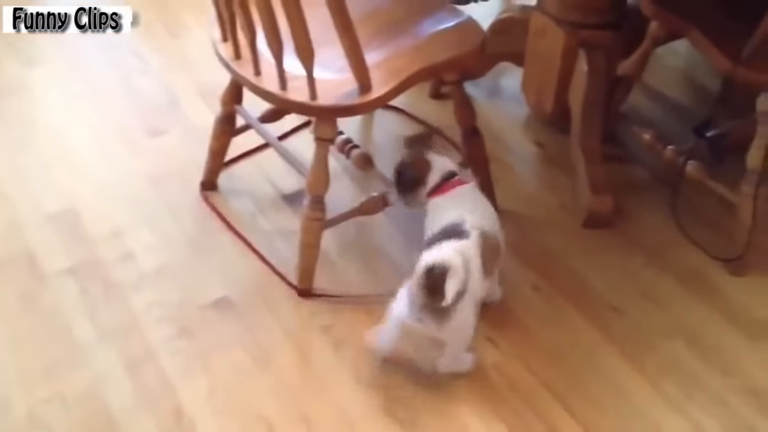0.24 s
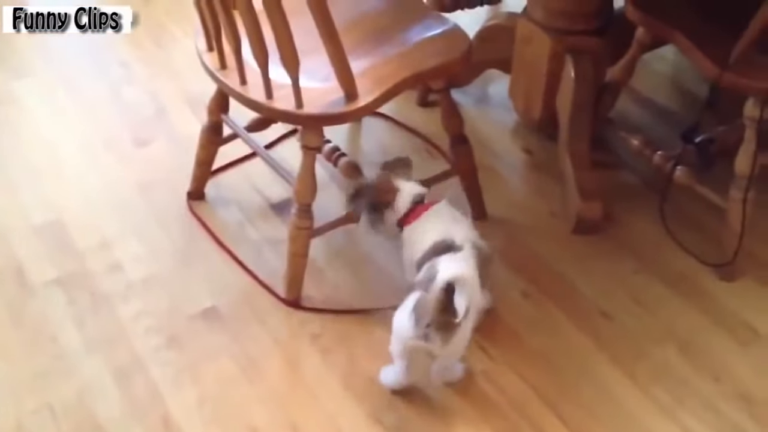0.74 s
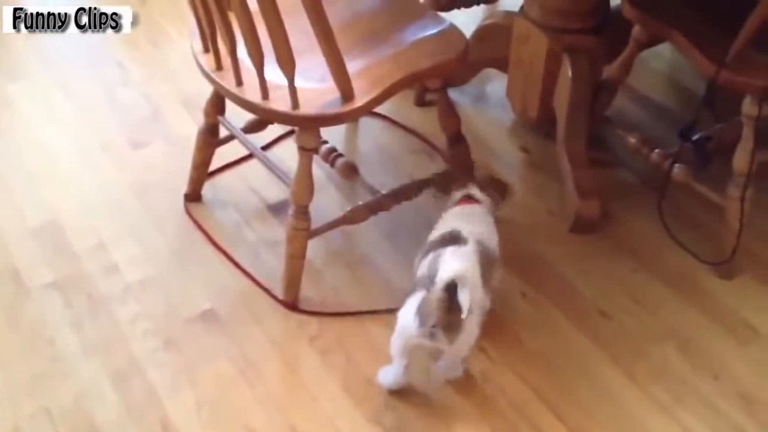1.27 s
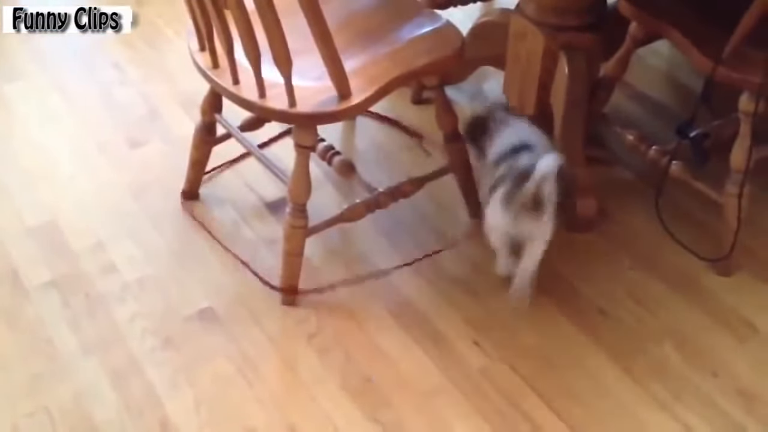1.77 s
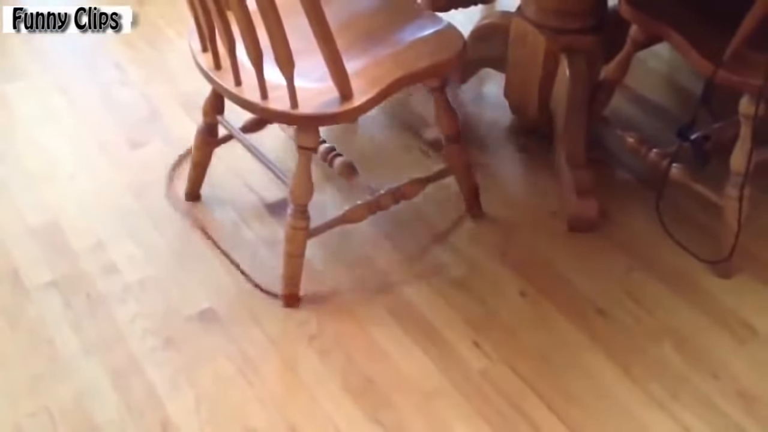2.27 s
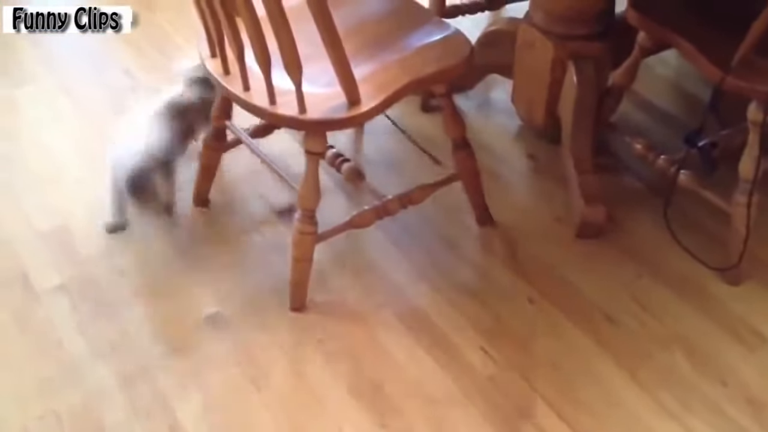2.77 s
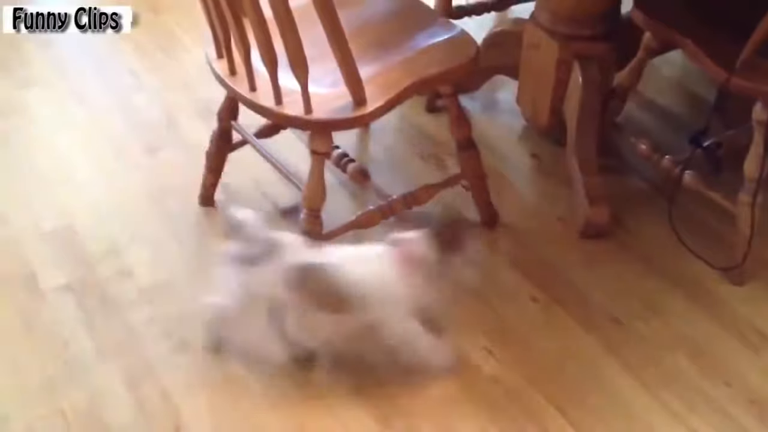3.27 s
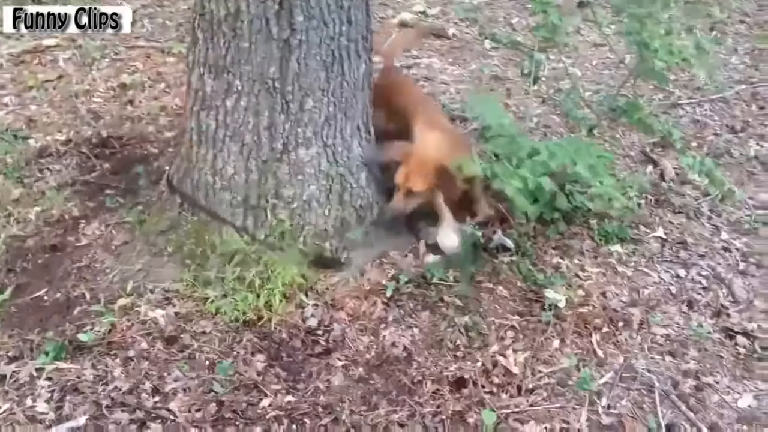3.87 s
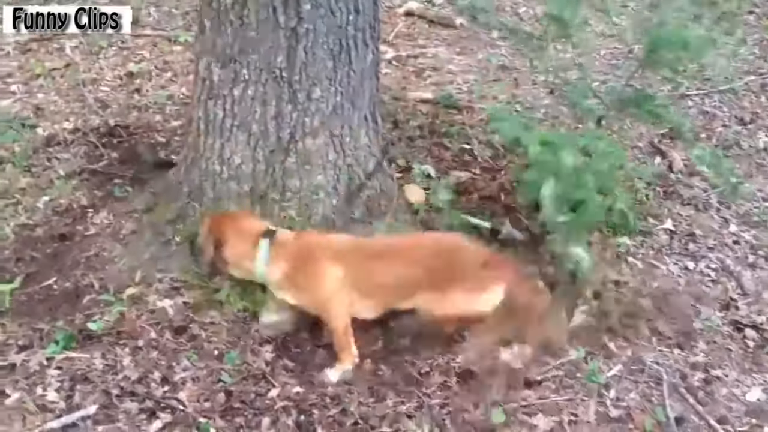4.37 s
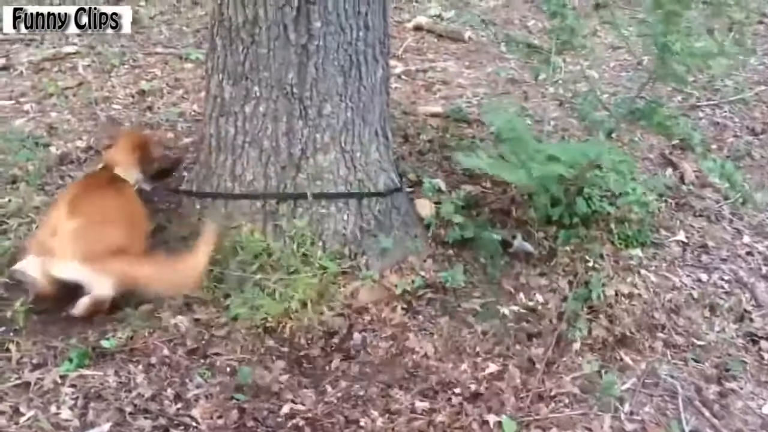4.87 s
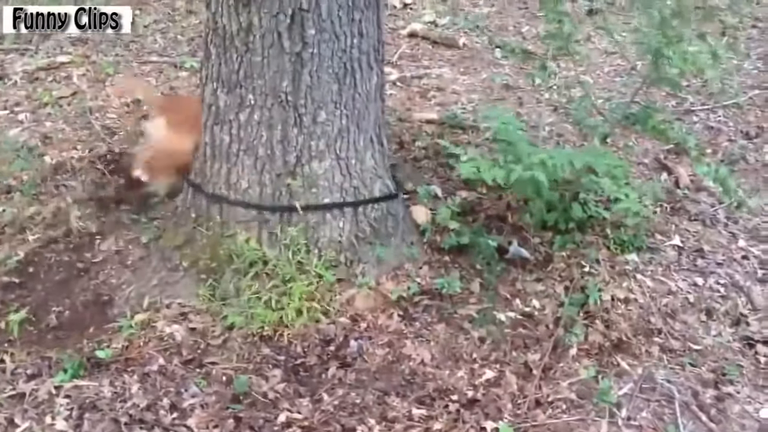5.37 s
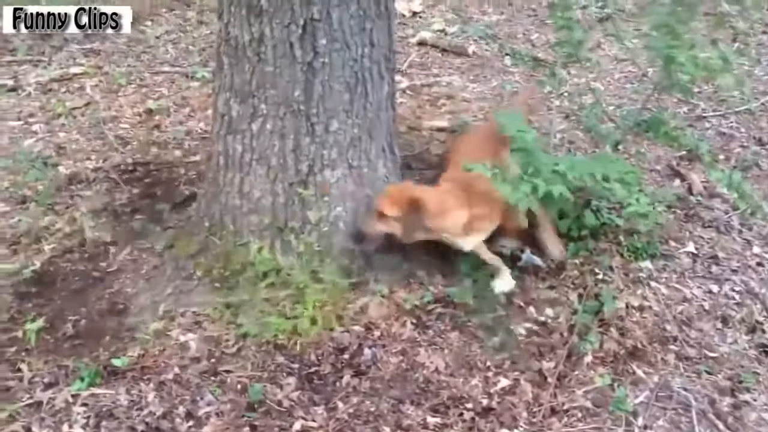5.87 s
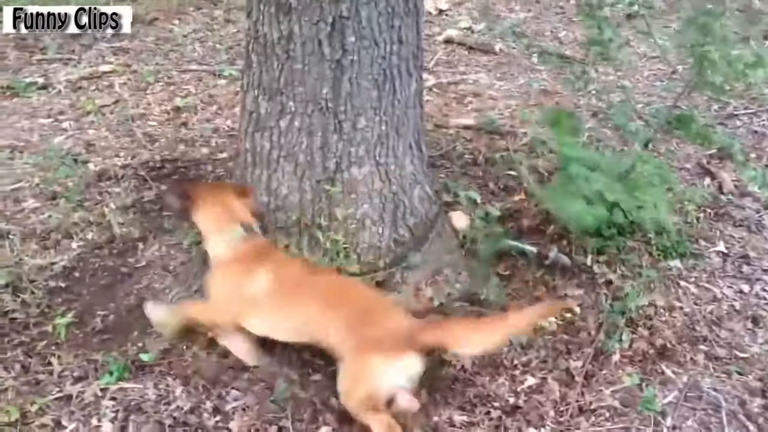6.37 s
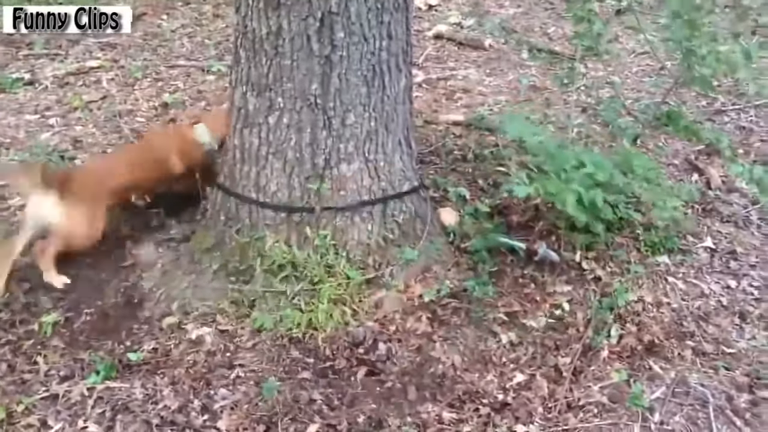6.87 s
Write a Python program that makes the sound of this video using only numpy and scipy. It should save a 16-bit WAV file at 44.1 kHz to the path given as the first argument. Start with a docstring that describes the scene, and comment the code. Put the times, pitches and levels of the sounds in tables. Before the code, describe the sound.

First, indoors with audible echo: bright tag clinks over a constant hum, a few claw clicks, then quicker scrabbling and scratching on wood. After a tiny gap the place switches to open air without echo: a hard burst of leaf crackle with sharp twig snaps, a tiny squeak, soft paw thuds and high tag pings, easing and then picking up again. Centred, fairly close, modest-quality sound.

```python
"""A steady hum fills a live room; over it a puppy circles a chair on a wooden floor, its tag clinking.
After a gap of about 40 ms a dog runs round a tree through dry leaves, tags jingling, twigs snapping.
Hum, air and leaves are filtered noise or random clicks; paws, claws, twigs and two small tag ticks are
clicks through a broad resonance; the other tag blows are short ringing tones with a bright tick.
Both channels are the same."""
import sys
import numpy as np
from scipy import signal
from scipy.io import wavfile

SR = 44100
rng = np.random.default_rng(int(sys.argv[2]) if len(sys.argv) > 2 else 0)


def inscribe(sig):
    """Save sig as 16-bit PCM at rate SR to the path in sys.argv[1].

    A 1-D sig is mono; a 2-D sig holds one channel per row.
    Samples are clipped to [-1, 1] before scaling.
    """
    pcm = np.round(np.clip(np.atleast_2d(sig).T, -1, 1) * 32767)
    wavfile.write(sys.argv[1], SR, pcm.astype(np.int16))


N = 313903   # samples, about 7.1 s


def amp(db):
    """Turn dB into a gain."""
    return 10 ** (np.asarray(db) / 20)


def rms_one(x):
    """Scale a sound to rms 1."""
    return x / np.sqrt(np.mean(x ** 2) + 1e-20)


def filtered(x, order, hz, kind):
    """Keep only part of the pitch range with a smooth (Butterworth) filter."""
    return signal.sosfilt(signal.butter(order, hz, kind, fs=SR, output="sos"), x)


def resonator(hz, r):
    """Feedback weights of a resonance at hz; the closer r is to 1, the longer it rings."""
    return [1, -2 * r * np.cos(2 * np.pi * hz / SR), r * r]


def in_time(rows):
    """Join the points in each table column by straight lines: curves with one value a sample."""
    s, *columns = np.transpose(rows)
    return [np.interp(np.arange(N) / SR, s, c) for c in columns]


def drift(rate_hz):
    """Slow random wander with spread 1: smoothed noise, one point every 40 samples, joined by lines."""
    r = np.exp(-80 * np.pi * rate_hz / SR)
    noise = rng.standard_normal(N // 40 + 2002)
    slow = signal.lfilter([1], [1, -2 * r, r * r], noise)[2000:]   # drop the filter's start-up
    return np.interp(np.arange(N) / 40, np.arange(len(slow)), rms_one(slow))


def grains(per_s, spread_db):
    """Random clicks of uneven size, scaled to rms 1."""
    size_db = spread_db * np.minimum(rng.exponential(1, N), 5)
    sizes = amp(size_db) * rng.choice([-1, 1], N)
    happens = rng.random(N) < per_s / SR
    return rms_one(sizes * happens)


def coloured(sources, spectrum, patchy_db, tilt_db=0):
    """Half-octave bands fed in turn by two sources, each with its own level and flicker; rms 1."""
    out = 0
    edges_hz = 40 * 2 ** np.arange(0, 9.1, .5)
    hz, db = np.transpose(spectrum)
    for k, (low, high) in enumerate(zip(edges_hz, edges_hz[1:])):
        band = filtered(sources[k % 2], 2, [low, high], "band")
        mid = np.sqrt(low * high)
        level_db = np.interp(np.log(mid), np.log(hz), db)
        level_db = level_db + tilt_db * np.log2(mid / 4000)   # tilt is per octave
        out = out + band * amp(level_db + patchy_db * drift(8.4))
    return rms_one(out)


def add(track, s, sound):
    """Mix a short sound in at time s."""
    i = round(s * SR)
    track[i:i + len(sound)] += sound[:N - i]


def knocks(rows, cycles, width, crumble):
    """A click and a crumbling tail of noise, both through a broad resonance at each knock's pitch.

    cycles: tail length to -60 dB; width: resonance width as a share of pitch; crumble: tail strength.
    """
    out, t = np.zeros(N), np.arange(5000) / SR
    for s, db, hz in rows:
        push = crumble * rng.standard_normal(len(t)) * amp(-60 * t * hz / cycles)
        push[0] += 1   # the click
        r = np.exp(-np.pi * width * hz / SR)
        tap = signal.lfilter([1, 0, -1], resonator(hz, r), push)
        add(out, s, amp(db) * tap / np.abs(tap).max())
    return out


# How loud the room noise is at each pitch: pitch_hz [Hz], level_db [relative dB per Hz]
ROOM_HUM_COLOUR = [(40, -75), (120, -9), (250, -5.5), (1100, -4), (2200, -12.5), (5000, -21),
                   (10000, -25.5), (16000, -26)]
# Broad resonances in the hum: pitch_hz [Hz], climb_hz_per_s [Hz/s], width_hz [Hz], level_db [dB]
HUM_RESONANCES = [(250, 0, 50, -52.5), (1030, 120, 110, -56), (1760, 100, 120, -59)]
ROOM_HUM_DB = -49


def hum():
    """Steady room noise with a few broad resonances in it; the upper ones climb slowly."""
    out = amp(ROOM_HUM_DB) * coloured(rng.standard_normal((2, N)), ROOM_HUM_COLOUR, patchy_db=2.5)
    t = np.arange(N) / SR
    for hz, climb_hz, width_hz, db in HUM_RESONANCES:
        # slow noise sways a tone in size and phase, spreading it into a broad peak
        smoothing = [1, -np.exp(-np.pi * width_hz / SR)]
        sway = signal.lfilter([1], smoothing, rng.standard_normal((2, N)))
        phase = 2 * np.pi * (hz + climb_hz * t / 2) * t
        out += amp(db) * rms_one(sway[0] * np.cos(phase) + sway[1] * np.sin(phase))
    return out


# How loud the outdoor air is at each pitch: pitch_hz [Hz], level_db [relative dB per Hz]
AIR_COLOUR = [(40, -81), (120, -3), (245, 3), (340, -6.5), (2500, -9), (5000, -8), (16000, -20.5)]
OUTDOOR_AIR_DB = -48


def outdoor_air():
    """Background noise outdoors: noise shaped band by band, each band flickering a little."""
    return amp(OUTDOOR_AIR_DB) * coloured(rng.standard_normal((2, N)), AIR_COLOUR, patchy_db=3.0)


# One short rising squeak: start_s [s], end_s [s], from_hz [Hz], to_hz [Hz], level_db [dB]
SQUEAK_GLIDE = (4.18, 4.228, 2320, 2600, -40)


def squeak():
    """A short tone gliding up, swelling and fading once."""
    start, end, from_hz, to_hz, db = SQUEAK_GLIDE
    part = np.clip((np.arange(N) / SR - start) / (end - start), 0, 1)
    phase = 2 * np.pi * np.cumsum(from_hz + (to_hz - from_hz) * part) / SR
    return amp(db) * np.sin(np.pi * part) * np.sin(phase)


# Paws and lead dragging on boards, as points of two level curves joined by straight lines:
# time_s [s], low_level_db [dB], high_level_db [dB]
SCRABBLE_LEVELS = [(0, -66, -104), (1.5, -53.5, -54.5), (2.2, -46, -49), (2.49, -43, -47.5),
                   (2.54, -34.5, -41.5), (2.66, -44.5, -49), (3.36, -51, -44)]


def scrabble():
    """Boards boom under the pads, claws and lead scratch above in uneven bursts."""
    low_db, high_db = in_time(SCRABBLE_LEVELS)
    boom = filtered(grains(900, 1.45), 2, [150, 800], "band")
    bursts = grains(2000 * amp(6 * drift(18)), 2.6)
    scratch = filtered(bursts, 2, [1200, 6500], "band")
    return amp(low_db + 1.26 * drift(15)) * rms_one(boom) + amp(high_db) * rms_one(scratch)


# Pads landing on boards, then on soil: start_s [s], peak_db [dB], pitch_hz [Hz]
PAD_LANDINGS = [(3.26, -31, 272), (4.284, -30.5, 234), (5.881, -32.5, 173), (6.015, -28.5, 526),
                (6.345, -36.5, 163)]


def pad_thuds():
    """Soft pads hit the ground: a low, quickly damped knock."""
    return knocks(PAD_LANDINGS, cycles=17.0, width=0.21, crumble=0.083)


# Claws tapping on boards, and at 2.278 s a tag's small bright tick (7100 Hz):
# start_s [s], peak_db [dB], pitch_hz [Hz]
CLAW_TAPS_AND_TAG_TICK = [(0.292, -29, 5240), (0.395, -35, 2700), (1.577, -39, 4800), (1.98, -25, 2400),
                          (2.278, -23.5, 7100), (2.3311, -28.5, 1170), (2.333, -28, 4500),
                          (2.5299, -19.5, 1500), (2.742, -25.5, 2260), (3.017, -24.5, 2260),
                          (3.0505, -29, 2920), (3.1595, -17, 2130), (3.3152, -26.5, 4050),
                          (3.3726, -20, 1230), (3.373, -34, 2600)]


def claw_taps_and_tag_tick():
    """Claws tap the boards and a tag ticks once: higher knocks, each with a crumbling tail."""
    return knocks(CLAW_TAPS_AND_TAG_TICK, cycles=130.0, width=0.35, crumble=0.15)


# Twigs snapping, and at 6.916 s a tag's small bright tick (7400 Hz):
# start_s [s], peak_db [dB], pitch_hz [Hz]
TWIG_SNAPS_AND_TAG_TICK = [(4.1696, -30, 2510), (4.2828, -13.5, 4630), (4.294, -14, 4940),
                           (4.3924, -18, 3500), (5.1215, -28, 4750), (5.2764, -27.5, 3800),
                           (5.9634, -29, 4100), (6.193, -25, 1850), (6.3191, -20.5, 3970),
                           (6.916, -23, 7400)]


def twig_snaps_and_tag_tick():
    """Dry twigs break and a tag ticks once: sharp clicks, each with a crumbling tail."""
    return knocks(TWIG_SNAPS_AND_TAG_TICK, cycles=110.0, width=0.2, crumble=0.15)


# Paws scuffing through the leaves: start_s [s], level_db [dB], length_s [s]
LEAF_SCUFFS = [(3.523, -42.5, 0.021), (3.874, -42.5, 0.064), (4.029, -35, 0.036), (4.094, -36.5, 0.016),
               (4.154, -40.5, 0.14), (4.269, -25.5, 0.049), (4.315, -34.5, 0.15), (4.373, -30, 0.016),
               (4.487, -30.5, 0.15), (4.67, -38.5, 0.092), (4.896, -40, 0.19), (5.111, -40, 0.026),
               (5.33, -39, 0.014), (5.854, -40.5, 0.073), (5.952, -37.5, 0.026), (6.019, -42.5, 0.09),
               (6.101, -38, 0.4), (6.293, -38.5, 0.11), (6.481, -35, 0.12), (6.681, -42, 0.14),
               (6.914, -43, 0.057)]
# How loud the crackle is at each pitch: pitch_hz [Hz], level_db [relative dB per Hz]
CRACKLE_COLOUR = [(100, -20), (250, -8), (1500, -3.5), (4000, 1.5), (9000, -1.5), (13000, -5.5),
                  (16000, -24)]
# leaves fly up at once, thin out under the paw and settle after it lifts
SCUFF_RISE_S, SAG_DB_PER_S, SETTLE_DB_PER_S = 0.014, 12.5, 190
STIR_DB = -50.5   # leaves never lie quite still round the dog


def leaves():
    """Thousands of dry crackles a second, clumped under each paw; harder kicks are brighter."""
    t, power = np.arange(N) / SR, amp(STIR_DB) ** 2
    for s, db, length_s in LEAF_SCUFFS:
        rise = np.clip((t - s) / SCUFF_RISE_S, 0, 1)
        sag_db = SAG_DB_PER_S * np.maximum(t - s, 0)
        settle_db = SETTLE_DB_PER_S * np.maximum(t - s - length_s, 0)
        power = power + (rise * amp(db - sag_db - settle_db)) ** 2
    level_db = 10 * np.log10(power)
    clumps = amp(2.3 * drift(60))
    crackle = [grains(4500 * clumps, 4.0) for _ in range(2)]
    tilt_db = 0.039 * (level_db + 19.5)   # louder means more treble
    return amp(level_db) * coloured(crackle, CRACKLE_COLOUR, patchy_db=1.9, tilt_db=tilt_db)


def tick(db, decay_s, clatter_db, clatter_s, t):
    """The bright edge of metal on metal, and the clatter of ring and buckle behind it."""
    shape = np.exp(-t / decay_s) + amp(clatter_db) * np.exp(-t / clatter_s)
    bright = signal.butter(1, [7000, 12000], "band", fs=SR)
    return amp(db) * signal.lfilter(*bright, rng.standard_normal(len(t))) * shape


# Outdoor tag blows: start_s [s], low_mode_db [dB], middle_modes_db [dB], high_modes_db [dB]
OUTDOOR_BLOWS = [(3.715, -44, -51, -34.5), (3.922, -47, -41, -28), (3.944, -39.5, -27.5, -47),
                 (4.148, -39, -45, -35), (4.268, -43, -37, -30.5), (4.502, -48, -24.5, -45),
                 (4.7416, -42, -44, -37), (4.7776, -41, -18, -39), (4.936, -36, -24, -34),
                 (5.237, -63, -30, -53), (5.86, -46, -24, -29), (5.9395, -49, -22.5, -39),
                 (5.992, -57, -29, -40), (6.448, -61, -32, -35), (6.4837, -43, -16.5, -29),
                 (6.669, -45, -16, -29), (6.693, -40, -26, -37), (6.727, -29, -35, -40),
                 (6.774, -40, -35, -37), (6.89, -42, -37.5, -39)]
# Tones (modes) of the outdoor tags: pitch_hz [Hz], time_to_minus_60_db_s [s], level_db [dB]
OUTDOOR_MODES = [(5930, 0.098, 2), (9040, 0.017, -8), (9700, 0.066, -6), (10030, 0.038, -9),
                 (11450, 0.052, 5), (14300, 0.029, -23)]
# Which blow level drives each tone: level_column [0 low, 1 middle, 2 high]
OUTDOOR_LEVEL_COLUMN = [0, 1, 1, 1, 2, 2]
# Tags brushing together, as points of a level curve joined by straight lines: time_s [s], level_db [dB]
JINGLE_LEVELS = [(5.08, -58), (5.16, -43.5), (5.33, -44), (5.4, -73), (6.65, -61), (6.72, -41)]
TICK_OUT_DB = -8.5   # against the blow's highest level


def tags_outdoors(rise_s):
    """Blows ring briefly in open air; lighter touches jingle at random between them."""
    out, t = np.zeros(N), np.arange(6000) / SR
    for s, *mode_db in OUTDOOR_BLOWS:
        blow = tick(max(mode_db) + TICK_OUT_DB, 0.002, -2.5, 0.031, t)
        for (hz, t60, db_mode), column in zip(OUTDOOR_MODES, OUTDOOR_LEVEL_COLUMN):
            # two tags: the pitch shifts a little from blow to blow
            wave = np.sin(2 * np.pi * hz * (1 + 0.008 * rng.standard_normal()) * t)
            shape = (1 - np.exp(-t / rise_s)) * amp(-60 * t / t60)
            blow = blow + amp(mode_db[column] + db_mode) * shape * wave
        add(out, s, blow)
    touches = grains(150, 2.0)
    jingle_db = in_time(JINGLE_LEVELS)[0]
    for hz, t60, db_mode in OUTDOOR_MODES[1:4]:   # only the middle tones jingle
        r = amp(-60 / (t60 * SR))
        strokes = touches * amp(5 * rng.standard_normal(N)) + 1e-18
        ring = signal.lfilter([1], resonator(hz, r), strokes)
        out += amp(jingle_db + db_mode) * rms_one(ring)
    return out


# Indoor tag blows: start_s [s], free_ring_s [s], then the levels of three tones:
# tone_7900_hz_db [dB], tone_11400_hz_db [dB], tone_5900_hz_db [dB]
INDOOR_BLOWS = [(0.2244, 0.031, -40.5, -35, -53.5), (0.398, 0.017, -15.5, -17.5, -40),
                (0.621, 0.011, -27.5, -31.5, -51), (0.8455, 0.0096, -35.5, -52, -61),
                (0.8899, 0.0063, -44, -39.5, -53), (0.9697, 0.0051, -44, -39.5, -64),
                (1.1293, 0.02, -23, -25.5, -39.5), (1.4097, 0.014, -59.5, -38.5, -59),
                (1.626, 0.033, -44, -52, -64), (1.6622, 0.022, -22.5, -25.5, -41),
                (1.9979, 0.012, -37.5, -33.5, -48), (2.0527, 0.011, -34.5, -39, -43),
                (2.2942, 0.0081, -45, -32, -56), (2.3342, 0.0053, -36.5, -35, -52),
                (2.4196, 0.01, -38, -24, -32), (2.4503, 0.019, -34.5, -21.5, -34.5),
                (2.486, 0.0074, -30, -42, -59), (2.5265, 0.064, -45, -27, -43),
                (2.585, 0.016, -19.5, -17.5, -58), (2.636, 0.0082, -24.5, -34, -58),
                (2.8145, 0.025, -29.5, -36, -47), (2.8539, 0.013, -27, -37, -45),
                (2.9457, 0.025, -41, -25.5, -51), (3.031, 0.0078, -11.5, -18.5, -50),
                (3.1852, 0.013, -42, -25, -48), (3.2665, 0.0038, -24.5, -28.5, -42),
                (3.4474, 0.018, -26, -32.5, -43), (3.49, 0.051, -23, -17.5, -35)]
# Tones (modes) of the indoor tag: pitch_hz [Hz], split_hz [Hz between the two tones of a pair]
INDOOR_MODES = [(7880, 45), (11410, 55), (14700, 45), (5880, 40)]
# How fast each tone dies against the fur: time_to_minus_60_db_s [s]
FUR_DAMPING_S = [0.022, 0.045, 0.03, 0.22]
TOP_MODE_DB = -5.5   # the top mode follows the weaker main mode
TICK_IN_DB = -3.5   # against the stronger main mode


def tag_indoors(lead_s, rise_s, pair_share):
    """The tag rings freely, then falls against the fur and is damped; each mode is a beating pair."""
    out, t = np.zeros(N), np.arange(12000) / SR
    rise = 1 - np.exp(-t / rise_s)
    # the tag twists as it rings, so each mode flutters in level and wavers in phase
    twists = [amp(2.2 * drift(70)) * np.exp(.9j * drift(40)) for _ in INDOOR_MODES]
    for s, free_s, *main_db, low_db in INDOOR_BLOWS:
        blow = tick(max(main_db) + TICK_IN_DB, 0.005, -11.0, 0.03, t)
        start = round(s * SR)
        shapes = [rise * amp(-60 * np.maximum(t - free_s, 0) / t60) for t60 in FUR_DAMPING_S]
        levels = [*main_db, min(main_db) + TOP_MODE_DB, low_db]
        for (hz, split_hz), level, shape, twist in zip(INDOOR_MODES, levels, shapes, twists):
            beat_phase = 2 * np.pi * split_hz * t + rng.normal(-1.5, .7)
            beat = 1 + pair_share * np.exp(1j * beat_phase)
            ring = beat * twist[start:start + len(t)] * np.exp(2j * np.pi * hz * t)
            blow = blow + amp(level) * shape * np.imag(ring)
        add(out, s - lead_s, blow)   # start early, since the ring takes a moment to build up
    return out


def room(x, t60, direct_gap_s):
    """Dense reflections: a tail of noise that builds up, then dies away."""
    t = np.arange(round(.9 * SR)) / SR
    tail = rng.standard_normal(len(t)) * amp(-60 * t / t60) * (1 - np.exp(-t / direct_gap_s))
    return signal.fftconvolve(x, tail / np.sqrt(np.sum(tail ** 2)))[:N]


# The gap between the two places: indoor_end_s [s], outdoor_start_s [s]
GAP_S = (3.494, 3.531)


def scene():
    """Indoor sound up to the gap, outdoor sound after it."""
    thuds = pad_thuds()
    tag = tag_indoors(lead_s=.002, rise_s=0.002, pair_share=0.3)
    close = tag + thuds + claw_taps_and_tag_tick()
    echo = amp(-6.0) * room(close, t60=.6, direct_gap_s=.012)
    indoors = hum() + scrabble() + close + echo
    outdoors = outdoor_air() + squeak() + thuds + twig_snaps_and_tag_tick() + leaves()
    outdoors = outdoors + tags_outdoors(rise_s=0.00043)
    t = np.arange(N) / SR
    indoor_end, outdoor_start = GAP_S
    # a faint dull remnant of the room lingers through the gap, fading at 300 dB per s
    remnant = amp(-16 - 300 * (t - indoor_end)) * filtered(indoors, 4, 3000, "low")
    mono = np.select([t < indoor_end, t < outdoor_start], [indoors, remnant], outdoors)
    return np.stack([mono, mono])


CUTOFF_HZ = 16400


def record(dry):
    """The bass is rolled off below 75 Hz, the top is cut steeply."""
    thin = filtered(dry, 2, 75, "high")
    return signal.sosfilt(signal.cheby2(14, 70, CUTOFF_HZ, fs=SR, output="sos"), thin)


dry = scene()
out = record(dry)
inscribe(out)
```